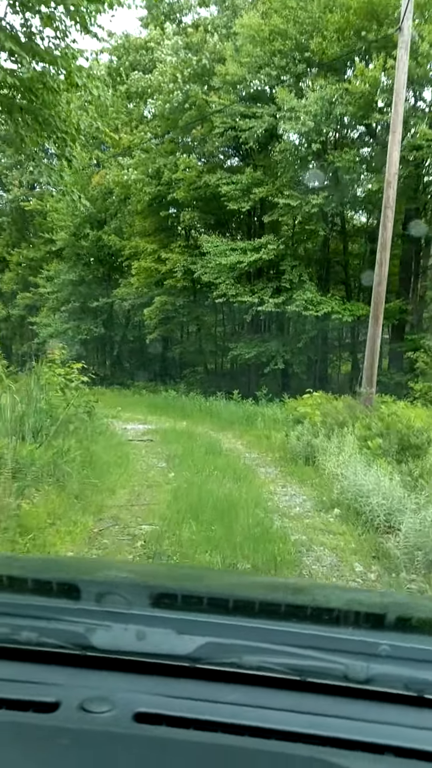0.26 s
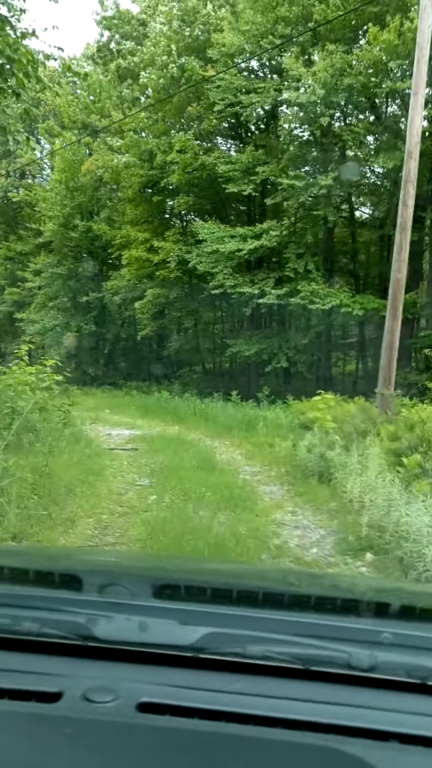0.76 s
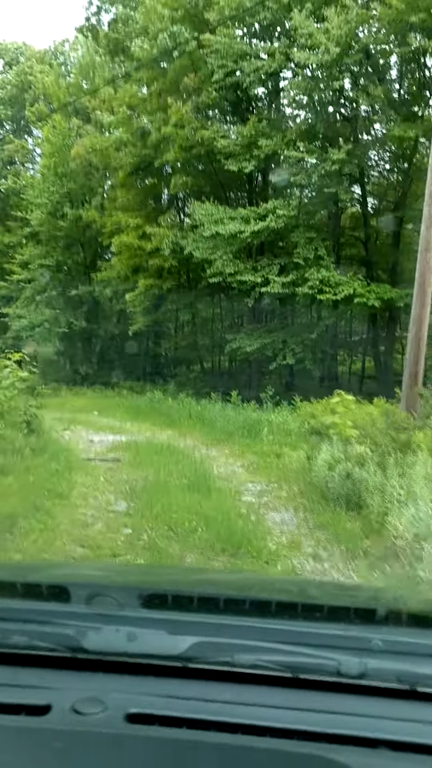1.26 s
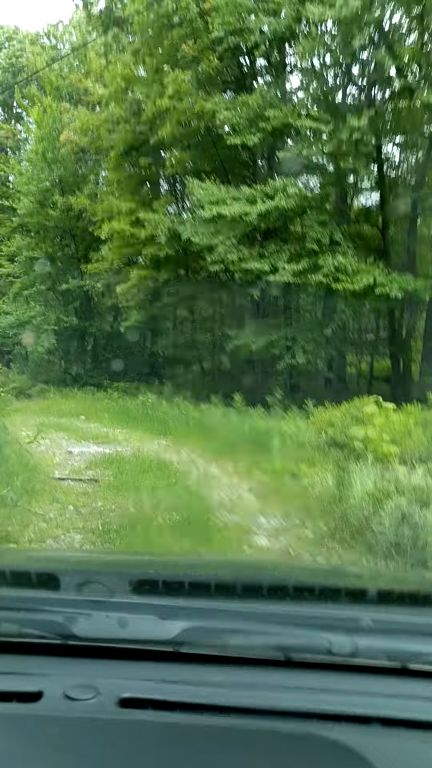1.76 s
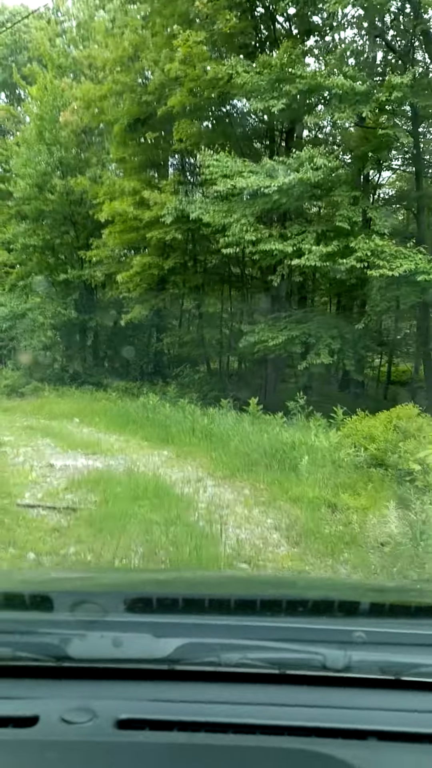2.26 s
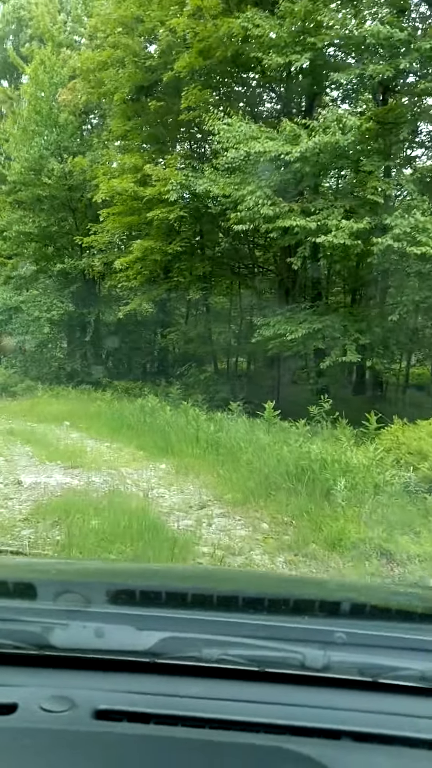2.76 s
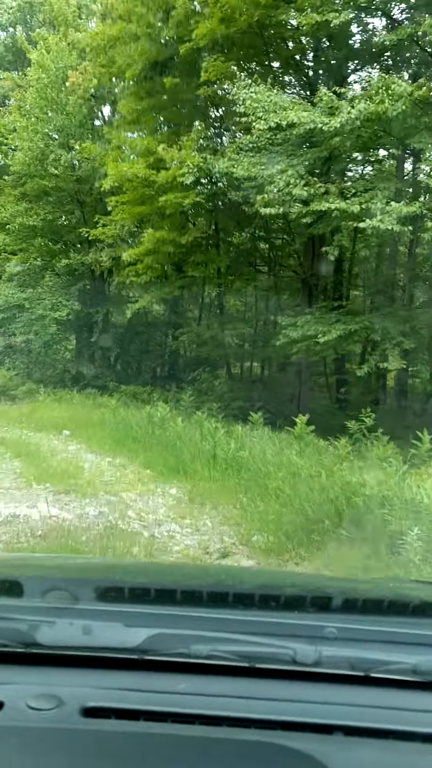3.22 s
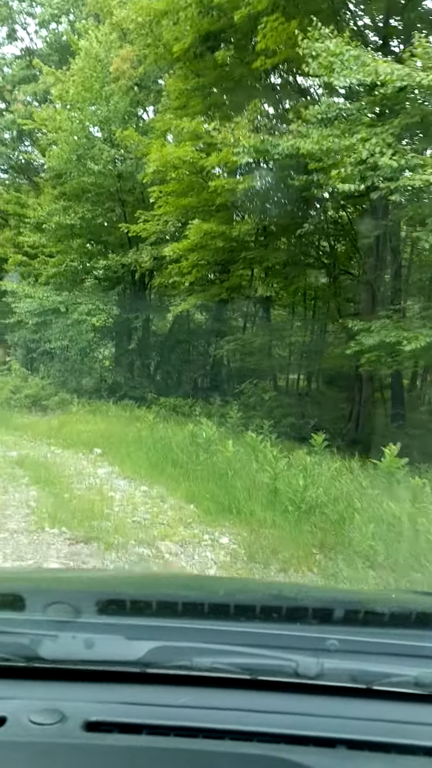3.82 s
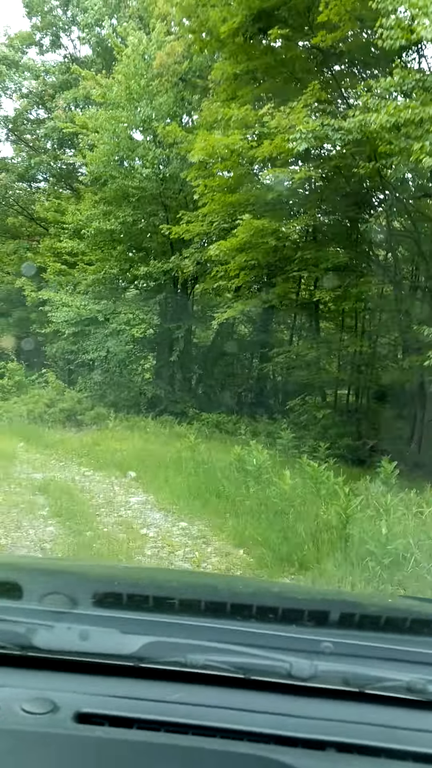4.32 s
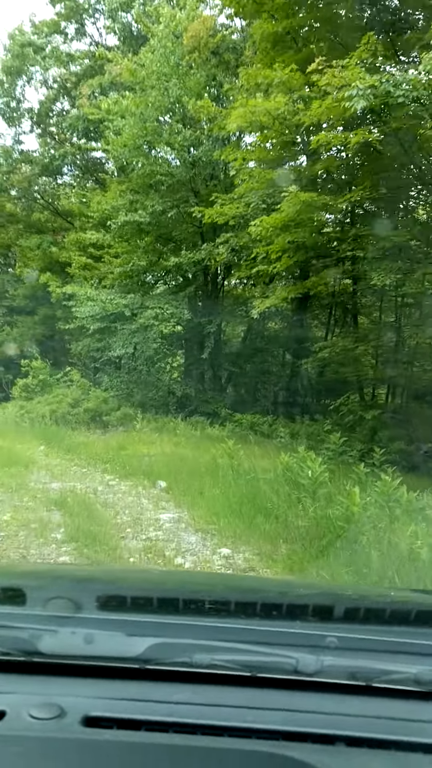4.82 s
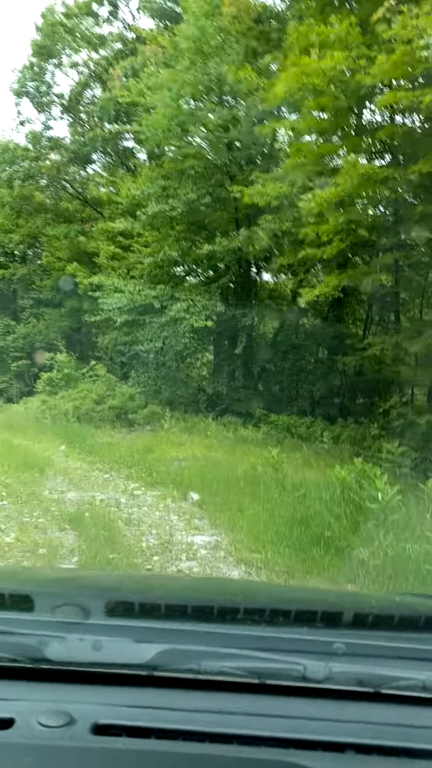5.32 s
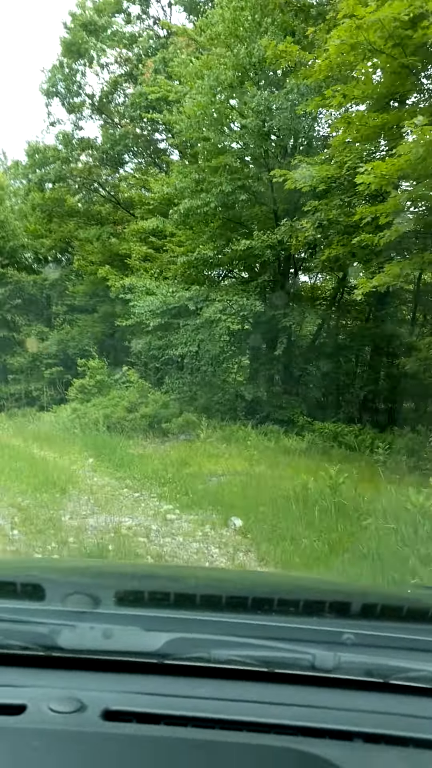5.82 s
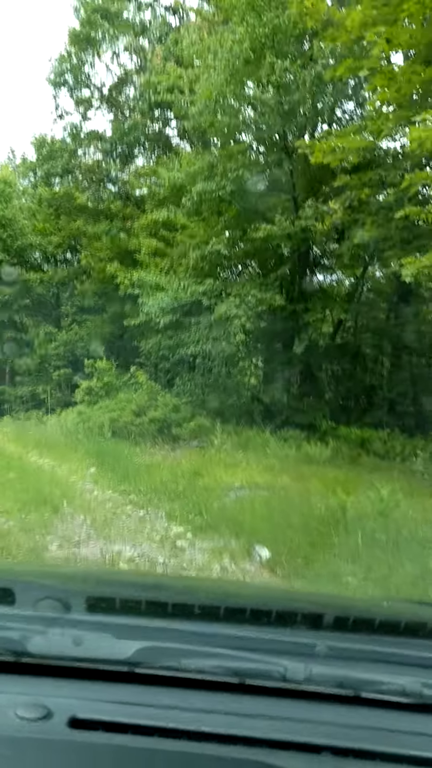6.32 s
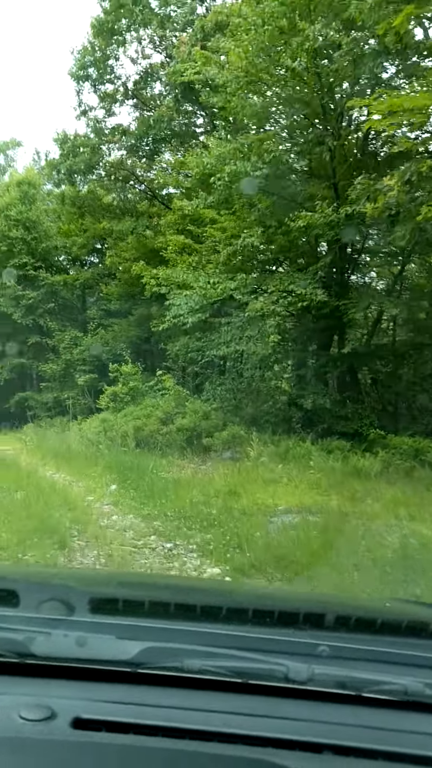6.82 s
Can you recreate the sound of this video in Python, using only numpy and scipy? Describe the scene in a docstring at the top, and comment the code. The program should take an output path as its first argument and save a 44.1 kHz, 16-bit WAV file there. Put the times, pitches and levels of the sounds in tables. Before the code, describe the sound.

Inside a car creeping over a stony grass track: deep cabin boom and tyre rumble, dull suspension thuds, hollow panel knocks and dry trim ticks.

```python
"""Inside a car creeping along a stony grass track. From the start the cabin air booms near 50 Hz (a gliding
tone and noise), road noise rumbles and stones crunch (shaped noise and short grains), over a faint high tone.
Soon wheels drop with thuds, and trim knocks and ticks (dying tones and noise bursts); from 2.3 s a small metal
part rings at times (groups of modes), and at 3.6 s and 4.9 s the floor pan hums (a dying tone). Near 5.4 s loose
metal bounces and jangles (ringing modes and a rasp); from 5.8 s trim creaks briefly (rubbed resonances)."""
import sys
import numpy as np
from scipy import signal
from scipy.fft import rfft, irfft, next_fast_len
from scipy.io import wavfile
from scipy.ndimage import uniform_filter1d, map_coordinates

SR = 44100
rng = np.random.default_rng(int(sys.argv[2]) if len(sys.argv) > 2 else 0)


def log_audio(samples):
    """Write samples as a 16-bit WAV file to the path given in sys.argv[1]."""
    # one column per channel
    frames = np.atleast_2d(samples).T
    # limit to full scale, then quantise
    limited = np.clip(frames, -1, 1)
    pcm = np.round(limited * 32767).astype(np.int16)
    wavfile.write(sys.argv[1], SR, pcm)


N = 312228  # length in samples


def amp(db):
    """Gain of a level in dB."""
    return 10 ** (np.asarray(db) / 20)


def unit(x):
    """x at rms 1."""
    return x / np.sqrt(np.mean(x ** 2) + 1e-20)


def noise(length):
    """White noise."""
    return rng.standard_normal(length)


def seconds(length):
    """Sample times of a sound lasting this many seconds."""
    return np.arange(int(SR * length)) / SR


def decay(t, t60):
    """A steady die-away that falls 60 dB in t60 seconds."""
    return amp(-60 * t / t60)


def soft_start(t, rise_s):
    """A quick but smooth rise from silence to full strength."""
    return 1 - np.exp(-t / rise_s)


def slow_start(t, rise_s):
    """A rise that begins gently, then swells to full strength."""
    return 1 - np.exp(-(t / rise_s) ** 2)


def sine(hz, t):
    """A pure tone of fixed pitch."""
    return np.sin(2 * np.pi * hz * t)


def gliding_sine(hz):
    """A pure tone whose pitch changes from sample to sample."""
    return np.sin(2 * np.pi * np.cumsum(hz) / SR)


def curves(rows):
    """One value per sample for each column after the time."""
    times, *columns = np.transpose(rows)
    return [np.interp(np.arange(N) / SR, times, column) for column in columns]


def wobble(rate):
    """A smooth random curve, rate knots a second."""
    knots = noise(int(N * rate / SR) + 4)
    return map_coordinates(knots, [np.arange(N) * rate / SR])


def coloured(x, points):
    """x through a spectrum of (frequency [Hz], gain [dB]) points on a log axis."""
    m = next_fast_len(len(x) + 8192)
    hz, db = np.transpose(points)
    bins = np.fft.rfftfreq(m, 1 / SR)
    gain = amp(np.interp(np.log(bins + 1), np.log(hz + 1), db))
    return irfft(rfft(x, m) * gain, m)[:len(x)]


def add(track, s, sound):
    """Mixes a sound in at s seconds."""
    part = track[round(s * SR):][:len(sound)]
    part += sound[:len(part)]


def ring(modes, t, scatter_db):
    """One blow on a set of modes (natural tones of an object), each at a new random strength."""
    total = np.zeros(len(t))
    for hz, db, t60 in modes:
        total += amp(db + rng.normal(0, scatter_db)) * decay(t, t60) * sine(hz, t)
    return total


LUMPS_DB = 1.8  # size of the slow random swells of boom and suspension

# Path of the cabin boom: (time [s], pitch [Hz], level [dB])
BOOM_PATH = [(0.0, 54.3, -39), (0.04, 55.6, -32.5), (0.47, 58.96, -30), (0.63, 51.9, -34.5),
             (0.71, 51.7, -40), (0.75, 55.2, -25.5), (0.87, 60.5, -36), (1.01, 60.2, -36), (1.05, 58, -65),
             (1.14, 55.35, -24.5), (1.22, 49, -32.5), (1.48, 48.3, -27.5), (1.62, 52.13, -33.5),
             (1.81, 52, -29.5), (1.93, 49.8, -34.5), (2.15, 48.1, -28), (2.27, 56.07, -35.5),
             (2.38, 48.64, -37), (2.66, 51.22, -25), (2.74, 48.4, -50), (2.8, 48.1, -25), (2.98, 53.2, -47),
             (3.06, 59.7, -39), (3.14, 63.96, -34), (3.23, 60.8, -28), (3.37, 51.22, -32.5),
             (3.69, 50.9, -32.5), (3.82, 45.5, -54), (3.86, 44.5, -37), (4.0, 49.3, -35),
             (4.26, 50.33, -34.5), (4.36, 54.4, -26.5), (4.51, 57.1, -47), (4.57, 50.7, -26),
             (4.65, 46.1, -35.5), (4.79, 41.63, -33), (5.17, 45.97, -34.5), (5.28, 54.5, -36),
             (5.4, 47.6, -34), (5.56, 48.25, -30.5), (5.64, 52.42, -33), (5.84, 56.1, -33),
             (6.13, 48.04, -32), (6.7, 50.6, -32), (6.98, 50.7, -35.5), (7.08, 56, -29)]


def boom():
    """The lowest cabin mode, dragged about by engine firing and bumps, with a rough skirt of noise."""
    hz, db = curves(BOOM_PATH)
    glide = gliding_sine(hz * (1 + 0.0838 * wobble(22)))
    skirt_shape = [(20, -25.0), (36, -3.5), (50, -7.0), (66, -2.0), (90, -12.5), (200, -85)]
    skirt = unit(coloured(noise(N), skirt_shape))
    tone = unit(amp(0.7 * wobble(24) + LUMPS_DB * wobble(9)) * glide)
    return amp(db) * (tone + 0.72 * skirt)


def jolts(rate, t60):
    """Small stones under the tyres: soft random bumps of level, about rate a second."""
    kicks = (rng.random(N) < rate / SR) * rng.exponential(size=N)
    t = seconds(1 / 8)
    return signal.fftconvolve(kicks, decay(t, t60) * soft_start(t, 0.0038))[:N]


# Road noise before it is shaken: (time [s], suspension level [dB], floor pan level [dB],
# tyre crunch level [dB], rustle level [dB])
ROAD_LEVELS = [(0.0, -33, -48, -53, -69.5), (0.43, -33.5, -45.5, -53.5, -74.5),
               (0.85, -36, -43.5, -54, -70.5), (1.14, -37, -43.5, -55, -72.5),
               (1.56, -39, -45.5, -58, -75.5), (1.73, -38, -41.5, -52, -68.5),
               (1.89, -31, -42.5, -54.5, -72), (2.62, -36.5, -42.5, -51, -69),
               (2.78, -36.5, -43, -51, -71.5), (3.1, -32, -45, -54, -70), (3.35, -36.5, -46, -56.5, -71.5),
               (3.84, -42.5, -46.5, -55, -70.5), (4.4, -33, -45.5, -55.5, -71),
               (4.79, -40.5, -44, -55.5, -70), (5.15, -35, -53.5, -56, -72),
               (5.32, -35.5, -41.5, -56.5, -69), (5.52, -34.5, -42, -54, -65.5),
               (5.72, -35.5, -49.5, -52, -66.5), (5.96, -52, -47.5, -61, -70.5),
               (6.17, -33.5, -43, -56, -73.5), (6.56, -38, -47, -60, -74.5), (7.08, -36.5, -45, -56.5, -72)]
# Tone colour of each path of road noise: (frequency [Hz], relative level [dB])
SUSPENSION_SHAPE = [(13, -27), (22, -12), (38, -12), (59, 2.5), (108, -4), (134, -7), (172, -25),
                    (216, -18), (260, -32.5), (340, -64), (570, -120)]
PAN_SHAPE = [(76, -53), (130, -1.5), (219, -8), (274, -11.5), (700, -31.5), (910, -47), (1540, -120)]
CRUNCH_SHAPE = [(240, -2.5), (400, 0.5), (650, -9), (890, -9), (1110, -9.5), (2660, -27), (3460, -38.5),
                (4500, -44), (5850, -57), (9900, -120)]
RUSTLE_SHAPE = [(1470, -10), (2500, -3.5), (3480, -1), (5640, -9.5), (8170, -9.5), (9570, -13.5),
                (15100, -16), (16100, -30), (16500, -56)]


def road():
    """Four paths of road noise; stones shake them partly together, partly each alone."""
    suspension_db, pan_db, crunch_db, rustle_db = curves(ROAD_LEVELS)
    shared, drops = jolts(70, 0.065), shake()

    def shaken(shape, depth, lumpy_db, drop_share):
        """Noise made uneven by stones, coloured by its path, then shaken by the wheel drops."""
        hiss = noise(N)
        stony = 1 + depth * (shared + jolts(60, 0.052))
        rough = hiss * stony * amp(lumpy_db * wobble(30))
        return (1 + drop_share * drops) * unit(coloured(rough, shape))

    lumps = amp(suspension_db + LUMPS_DB * wobble(9))
    suspension = lumps * shaken(SUSPENSION_SHAPE, depth=0.045, lumpy_db=0.52, drop_share=0.92)
    pan = amp(pan_db) * shaken(PAN_SHAPE, depth=0.36, lumpy_db=2.97, drop_share=0.75)
    crunch = amp(crunch_db) * shaken(CRUNCH_SHAPE, depth=0.48, lumpy_db=2.46, drop_share=0.2)
    rustle = amp(rustle_db) * shaken(RUSTLE_SHAPE, depth=0.32, lumpy_db=3.0, drop_share=0.12)
    return suspension + pan + crunch + rustle


# Stone grains, one row for large and one for small stones: (grains per second [1/s], smallest level [dB]
# before crunch and pitch shift it, level range [dB], centre pitch [Hz], pitch spread [octaves],
# cycles to fall 20 dB [cycles])
COARSE_STONES = (260, -62, 13, 900, .6, 4)
FINE_STONES = (340, -76, 13, 2500, .45, 3)


def grit(rate, least_db, range_db, centre_hz, octaves, life):
    """Single stones crunch under the tyres: short damped grains, following the tyre crunch."""
    crunch_db = curves(ROAD_LEVELS)[2]
    chance = rng.random((round(rate * N / SR), 2))
    start = (chance[:, :1] * N).astype(int)
    size = chance[:, 1:] ** 3  # mostly small, now and then large
    hz = centre_hz * 2 ** (octaves * noise((len(chance), 1)))
    k = np.arange(SR // 40)
    cycles = hz * k / SR
    follow_db = crunch_db[start] - crunch_db.mean()
    db = least_db + range_db * size + follow_db - 6 * np.log2(hz / centre_hz)
    grains = amp(db - 20 * cycles / life) * np.sin(2 * np.pi * cycles)
    return np.bincount((start + k).ravel(), grains.ravel())[:N]


# Wheel drops: (time [s], level [dB], pitch [Hz])
WHEEL_DROPS = [(0.191, -27, 103.5), (0.383, -22, 242), (0.465, -26, 101), (0.734, -25.5, 219),
               (0.89, -22, 126), (1.024, -11, 107), (1.134, -18, 103.7), (1.255, -24, 194),
               (1.319, -16.5, 127), (1.756, -14, 121), (1.837, -25, 118), (2.122, -28, 122.5),
               (2.154, -28, 96.7), (2.337, -19, 176), (2.388, -33, 146), (2.45, -20, 147),
               (2.51, -17.5, 104.1), (2.556, -20.5, 126), (2.87, -30.5, 257), (3.152, -23, 139.4),
               (3.527, -22, 116), (3.575, -30, 144), (3.588, -24.5, 302), (3.616, -17, 121),
               (3.968, -24, 154.7), (4.146, -34, 102.4), (4.285, -43, 101.9), (4.516, -29, 290),
               (4.526, -16.5, 130), (4.708, -24, 198.9), (5.408, -23, 128), (5.601, -26.5, 100.3),
               (5.931, -13, 122), (6.043, -26, 102.8), (6.216, -54, 117), (6.71, -22.5, 105.7),
               (6.845, -19.5, 100.3)]
# The floor pan hums by itself: (time [s], level [dB])
PAN_HUMS = [(3.59, -32.5), (4.86, -43.5)]
PAN_HUM_HZ, PAN_HUM_T60_S = 215.3, 0.7
THUMP_DB, THUMP_T60_S = -22, 0.083  # rough thump under the pitched thud


def thuds():
    """A wheel drops: soft cycles of the floor pan over a rough thump; at two moments the pan hums by itself."""
    out, t = np.zeros(N), seconds(1 / 2)
    thump_shape = [(60, -21), (180, -8.5), (350, 6.0), (600, -27.5), (1200, -21.5), (20000, -88)]
    for s, db, hz in WHEEL_DROPS:
        thump = amp(THUMP_DB) * decay(t, THUMP_T60_S) * unit(coloured(noise(len(t)), thump_shape))
        thud = decay(t, 0.063) * sine(hz, t)
        add(out, s, amp(db) * soft_start(t, 0.0057) * (thud + thump))
    hum = decay(t, PAN_HUM_T60_S) * soft_start(t, 0.006) * sine(PAN_HUM_HZ, t)
    for s, db in PAN_HUMS:
        add(out, s, amp(db) * hum)
    return out


SHAKE_LEAD_S = 0.03  # the shaking starts before the wheel lands
SHAKE_RISE_S, SHAKE_T60_S = 0.045, 0.21
SHAKE_REFERENCE_DB = -32  # a wheel drop at this level shakes with strength 1, before rise and decay


def shake():
    """How hard the body shakes around the wheel drops."""
    strength, t = np.zeros(N), seconds(1 / 3)
    swell = decay(t, SHAKE_T60_S) * slow_start(t, SHAKE_RISE_S)
    for s, db, _ in WHEEL_DROPS:
        add(strength, s - SHAKE_LEAD_S, amp(db - SHAKE_REFERENCE_DB) * swell)
    return strength


# Resonances of the dashboard panels: (frequency [Hz], width [Hz], level [dB])
PANEL_MODES = [(383, 40, 6), (540, 50, 8), (617, 50, 10), (782, 40, 7), (892, 35, 6), (1150, 200, -12),
               (1411, 60, 3), (1668, 80, 5), (1772, 50, 4), (2181, 80, 2), (2588, 60, 2), (2806, 60, 6)]


def panelled(x):
    """x with the resonances of the dashboard panels laid over it."""
    m = next_fast_len(len(x) + 8192)
    f = np.fft.rfftfreq(m, 1 / SR)
    response = 0.5  # the part that passes unchanged in tone
    for hz, width, db in PANEL_MODES:
        response = response + amp(db) * 1j * f * width / (hz * hz - f * f + 1j * f * width)
    return irfft(rfft(x, m) * response, m)[:len(x)]


# Hollow knocks of panels: (time [s], level [dB], pitch [Hz], relative level of the upper lobe [dB],
# length of the contact [s])
PANEL_KNOCKS = [(0.175, -39.5, 910, -15, 0.006), (0.903, -32.5, 870, -19.5, 0.0037),
                (.992, -45, 1270, -13, 0.01), (1.004, -33, 580, -32, 0.0099),
                (1.029, -37.5, 630, -21, 0.0097), (1.385, -43, 666, -17, .004),
                (1.489, -45, 1110, -21, .004), (1.814, -38, 603, -29, 0.0035),
                (2.037, -36, 640, -16, 0.0025), (2.126, -35.5, 493.5, -18, 0.014),
                (2.331, -28.5, 579, -6, 0.0087), (2.552, -37, 804, -15, 0.005),
                (2.6, -42.5, 851.6, -15, .006), (2.745, -47, 1133, -30, 0.0028),
                (2.772, -28, 500, -34, 0.0075), (2.96, -36.5, 497, -17, 0.0026),
                (3.209, -37.5, 731, -12, 0.0064), (3.285, -46, 794.6, -18, 0.03),
                (3.345, -39, 915, -26, 0.019), (3.38, -51, 914.5, -10, 0.0085),
                (3.515, -36.5, 1008, -18, 0.017), (3.585, -41, 665, -22, 0.0051),
                (3.84, -40, 539, -7.5, 0.0052), (4.151, -39, 658, -9, 0.0027),
                (4.385, -38, 950, -22, 0.0018), (4.4, -52, 900, -10, 0.0076),
                (4.457, -47, 1035, -27, 0.0076), (4.513, -36, 750, -27, 0.0096),
                (5.052, -26, 538, -17.5, 0.0013), (5.371, -27.5, 572, 7, 0.0033),
                (5.42, -45, 1000, -20, 0.024), (5.444, -30.5, 492, -47, 0.0044),
                (5.659, -26.5, 459.7, -13, 0.0049), (5.894, -22, 633, -6, 0.0013),
                (5.8955, -18.5, 615, -5.5, 0.011), (6.134, -42, 592, -15, 0.0084),
                (6.175, -47, 697, -9, .015), (6.428, -45.5, 653, -7, 0.0071),
                (6.569, -44, 612, -15.5, 0.017), (6.934, -40.5, 569.5, -33, 0.0075)]
KNOCK_T60_S = 0.052  # counted from the end of the contact


def knocks():
    """A soft blow: noise around a pitch through the panel modes, swelling and holding during the contact."""
    out, t = np.zeros(N), seconds(1 / 8)
    for s, db, hz, upper_db, contact_s in PANEL_KNOCKS:
        after = np.maximum(t - contact_s, 0)
        envelope = amp(-60 * (after / KNOCK_T60_S) ** 1.08) * soft_start(t, 0.00014 + 0.13 * contact_s)
        shape = [(hz / 2.9, -22), (hz / 1.42, -5), (hz, 0), (hz * 1.17, -4),
                 (hz * 1.17 + 250, min(-6, upper_db + 17.0)), (1900, upper_db - 0.5),
                 (2400, upper_db - 5.5), (4000, upper_db - 13.0), (20000, -90)]
        blow = envelope * panelled(coloured(noise(len(t)), shape))
        even = np.linalg.norm(envelope) / np.linalg.norm(blow)  # evens out the luck of the noise
        add(out, s, amp(db) * 0.34 * even * blow)
    return out


# Dry ticks of trim: (time [s], level [dB], relative level of the hollow body [dB],
# relative level of the treble [dB], snap centre [Hz], nominal decay [s], scaled and limited in ticks())
TRIM_TICKS = [(.2633, -42.5, -4.5, -19, 3240, 0.05), (.396, -49, -7, -36, 4030, .036),
              (.4753, -47.5, -16, -34, 2980, 0.048), (.5665, -44, -8.5, -11.5, 3340, 0.066),
              (.7234, -30, -19, -25, 4600, 0.024), (.7262, -24, -14, -17, 3760, 0.049),
              (.7805, -48, -25, -23, 5270, .025), (.7872, -30, -20, -18, 4386, 0.047),
              (.7935, -36, -17, -12, 4560, 0.025), (.993, -58, 1, -30, 3085, 0.055),
              (1.0762, -41, -22, -42, 4060, 0.022), (1.3244, -43, -6.5, -13.5, 3680, 0.047),
              (1.4596, -44, -16, -34, 3926, 0.028), (1.49, -73, 4, -21, 3146, 0.038),
              (1.705, -54, -25, -35, 3900, .025), (1.731, -45.5, -21, -9.5, 3300, 0.14),
              (1.7624, -43, -11, -28, 3860, 0.051), (1.7753, -40.5, -10, -10, 3950, 0.03),
              (1.8165, -40.5, -2, -40, 2500, 0.024), (1.8961, -43.5, -17, -24, 3400, 0.062),
              (1.9375, -44.5, -13, -31, 4050, 0.047), (1.9803, -47, -20, -14, 3962, 0.037),
              (2.0776, -47.5, -16, -6.5, 4820, 0.14), (2.2345, -34, -13, -14, 4840, 0.03),
              (2.2418, -38, -23, -18, 4345, 0.024), (2.3322, -34, -12.5, -21, 3437, 0.074),
              (2.387, -37, -23, -26, 3750, 0.035), (2.452, -48, -25, -15, 3770, 0.047),
              (2.5563, -39, -18, -18.5, 3240, 0.13), (2.6115, -43, -11, -14, 3320, 0.05),
              (2.7422, -47.5, -11, -15, 3713, 0.22), (3.1194, -47, -16, -10, 3460, 0.14),
              (3.209, -56.5, 1, -16, 3333, 0.074), (3.5253, -46, -10.5, -17.5, 3307, 0.14),
              (3.6088, -32.5, -10.5, -7, 3534, 0.047), (3.6576, -44, -19, -17.5, 3090, 0.066),
              (3.7172, -45, -8, -8, 4113, 0.029), (4.1555, -38, -13, -12, 4180, 0.049),
              (4.261, -48.5, -12, -17, 3500, 0.19), (4.391, -52, -8, -25, 3600, 0.032),
              (4.4214, -38.5, -12, -13.5, 4026, 0.046), (4.5104, -50, -11, -18, 3000, 0.086),
              (4.482, -58, -20, -7, 4000, .04), (4.661, -54, -25, -30, 3700, .03),
              (4.7227, -40, -2.5, -11, 3920, 0.023), (4.8186, -51.5, 4, -23, 3470, 0.044),
              (5.0504, -39.5, -27, -16.5, 3155, 0.17), (5.147, -59, -25, -30, 4676, 0.036),
              (5.293, -65, -20, 3, 3940, 0.023), (5.3196, -35.5, -8, -11.5, 4140, 0.033),
              (5.3368, -34, -19, -18, 3700, 0.035), (5.3498, -28.5, -14, -18.5, 4900, 0.045),
              (5.372, -26, -10, -16.5, 3930, 0.04), (5.3857, -25.5, -3, -16, 5250, 0.023),
              (5.3979, -29.5, -5, -18, 4630, 0.046), (5.656, -37.5, -2.5, -21, 4536, 0.035),
              (5.7096, -47, -16, -16, 3370, 0.059), (5.894, -27, -12, -11, 3452, 0.11),
              (5.9, -20, -30, -17.5, 4530, 0.066), (5.9497, -45, -19, -10.5, 4170, 0.042),
              (6.333, -46.5, -29, -7, 3130, 0.1), (6.354, -43, -15, -28, 3427, 0.079),
              (6.3754, -47, -9, -19, 3142, 0.04), (6.4692, -42, -26, -16.5, 4590, 0.05),
              (6.7126, -43.5, -17, -18, 3116, 0.052), (6.773, -45, -3, -17, 3634, 0.019),
              (6.8638, -45.5, -18, -37, 3397, 0.036)]
# Modes of the trim: (frequency [Hz], decay by 60 dB [s])
TRIM_MODES = [(2600, .05), (3240, .022), (3500, .04), (3820, .025), (4010, .022), (4350, .022),
              (4720, .022), (4980, .02), (5600, .02)]
FAINT_TICKS = 36  # how many faint ones fall at random
TICK_RISE_S, CRACK_T60_S = 0.00064, 0.0057
TICK_CLOSES = 1.4  # above 1 the decay steepens as it goes
BODY_RISE_S = 0.0032  # the hollow behind the trim answers a tick late
TREBLE_T60_SHARE = 0.73  # the treble dies sooner
SNAP_RING, SNAP_FALL_DB = 0.085, 20  # share of the trim's ring; its loss per octave from the snap centre


def ticks():
    """A sharp crack, a short ring of the trim and a burst that dies in the cabin's padding."""
    out, t = np.zeros(N), seconds(1 / 8)
    # random rows between these limits, columns as in TRIM_TICKS
    faint = rng.uniform([0, -76, -20, -30, 3000, .03], [N / SR - .1, -68, -8, -10, 4500, .05],
                        size=(FAINT_TICKS, 6))

    def closing(life):
        """A decay that steepens as it goes."""
        return amp(-60 * (t / life) ** TICK_CLOSES)

    def fall(t60):
        """A quick crack, then a longer tail."""
        return 0.5 * closing(np.clip(t60, .01, .13) / 1.41) + 2.0 * decay(t, CRACK_T60_S)

    for s, db, body_db, top_db, snap_hz, t60 in [*TRIM_TICKS, *faint]:
        hollow = [(300, body_db - 33), (800, body_db + 5.5), (1300, body_db + 4.5), (1900, body_db + 14.5),
                  (2500, body_db + 5.5), (3300, body_db - 3), (16000, body_db - 54.5)]
        plastic = [(600, -50), (snap_hz * .5, -13), (snap_hz * 0.76, -5), (snap_hz, -1.5),
                   (snap_hz * 1.15, -4), (7500, -18), (16000, -60)]
        treble = [(3000, top_db - 36.0), (6000, top_db + 0.5), (7400, top_db + 5.5),
                  (11000, top_db + 3.5), (15600, top_db - 1), (16400, top_db - 7)]
        body = coloured(noise(len(t)), hollow) * closing(np.clip(0.67 * t60, .01, .1))
        body *= slow_start(t, BODY_RISE_S)
        burst = coloured(noise(len(t)), plastic) * fall(t60)
        burst += coloured(noise(len(t)), treble) * fall(TREBLE_T60_SHARE * t60)
        modes = [(hz, -SNAP_FALL_DB * abs(np.log2(hz / snap_hz)), life) for hz, life in TRIM_MODES]
        snap = SNAP_RING * ring(modes, t, scatter_db=8.0)
        add(out, s, amp(db) * (body + burst + snap) * soft_start(t, TICK_RISE_S))
    return out


# Loose metal slides: (time [s], level [dB], slide length [s], decay by 60 dB of the contacts at its end [s])
SLIDES = [(5.384, -54, 0.0023, 0.025), (5.389, -59, 0.0016, 0.033), (5.417, -45, 0.021, .06),
          (5.478, -57, 0.01196, 0.056)]
# Modes of the loose bunch: (frequency [Hz], relative level [dB], decay by 60 dB [s])
BUNCH_MODES = [(834, 3, .2), (1020, 2, .16), (1230, -7, .12), (1640, -11, .12), (2240, -10, .2),
               (2430, 1, .08), (2800, -10, .24), (3180, -13, .08), (3610, -6, .1), (3870, -1, .1),
               (3994, -4, .13), (4180, -6, .1), (4400, -4, .11), (4590, -11, .12), (5000, 0, .1),
               (5320, -9, .11), (6160, -20, .08), (6578, -16, .1), (6760, -13, 0.11), (7100, -12, 0.089),
               (7165, -10, .1), (7440, -9, .1), (7612, -10, .1), (7919, -15, 0.092), (8242, -19, .08),
               (8800, -17, .08), (9399, -13, .09), (9641, -16, .09), (9991, -15, .11)]
BUNCH_SCATTER_DB = 2.5
BUNCH_ROUGH = 0.55  # share of rattle in each mode's ring


def jangle():
    """The loose bunch lands and slides: a spray of tiny contacts keeps ringing its many modes over a rasp."""
    out, t = np.zeros(N), seconds(1 / 3)
    rasp_shape = [(500, -28), (1000, -2), (3000, -25), (4000, -3), (4700, -8), (6000, -12),
                  (7300, -17.0), (9500, -10), (11000, -9), (16000, -14.5)]
    for s, db, length, t60 in SLIDES:
        spray = noise(len(t)) * rng.exponential(size=len(t))
        chatter = spray * decay(np.maximum(t - length, 0), t60)
        chatter = chatter / np.linalg.norm(chatter)
        rung = np.zeros(len(t))
        for mode in BUNCH_MODES:
            blow = ring([mode], t, BUNCH_SCATTER_DB)
            blow *= 1 + BUNCH_ROUGH * unit(uniform_filter1d(noise(len(t)), size=150))
            # the contacts spread the ringing in time; the mode keeps its strength
            rung += unit(signal.fftconvolve(chatter, blow)[:len(t)]) * blow.std()
        add(out, s, amp(db) * (rung + 35 * coloured(chatter, rasp_shape)))
    return out


# Rings of the metal part: (time [s], level [dB], relative level of its lowest mode [dB],
# of its middle modes [dB], of its top mode [dB])
METAL_RINGS = [(2.331, -38.5, -34, -9, -25), (4.513, -45, -29, -17, -21), (5.0552, -46, -30, -28, -10),
               (5.6567, -58, -25, -3, -11), (5.8978, -39, -20, 2, -9), (5.9143, -40, -16, -1, -7),
               (5.929, -50, -5, -20, -20), (6.0184, -53, -25, -13, -12)]
# Modes of the metal part: (frequency [Hz], relative level [dB], decay by 60 dB [s]);
# rows: two main modes, the lowest, two middle ones, the top one
METAL_MODES = [(11110, 0, .06), (11176, -12, .06), (5852, -10, .16), (7325, 1, .055), (9700, -6, .07),
               (13088, -8, .13)]
PING_SCATTER_DB = 2.5
PING_ROUGH = 0.25  # share of rattle in the ring


def pings():
    """A small metal part is shaken for a few ms, so its ring swells before it dies."""
    out, t = np.zeros(N), seconds(1 / 5)
    groups = [METAL_MODES[:2], METAL_MODES[2:3], METAL_MODES[3:5], METAL_MODES[5:]]
    for s, db, low_db, middle_db, top_db in METAL_RINGS:
        sound = np.zeros(len(t))
        for group_db, modes in zip([0, low_db, middle_db, top_db], groups):
            sound += amp(group_db) * ring(modes, t, PING_SCATTER_DB)
        rattle = 1 + PING_ROUGH * unit(uniform_filter1d(noise(len(t)), size=60))
        add(out, s, amp(db) * slow_start(t, 0.0065) * rattle * sound)
    return out


# Short creaks of trim: (time [s], peak level [dB], length of the rub [s])
TRIM_CREAKS = [(5.791, -41.5, 0.015), (5.853, -55, 0.011), (6.604, -50, 0.021)]
# Resonances that creak: (frequency [Hz], width [Hz], relative level [dB])
CREAK_RESONANCES = [(1552, 62, 7), (1821, 66, 6)]


def creaks():
    """Trim rubs for a moment and sounds two narrow resonances."""
    out, t = np.zeros(N), seconds(1 / 10)
    ringing = np.zeros(len(t))
    for hz, width, db in CREAK_RESONANCES:
        ringing += amp(db) * np.exp(-np.pi * width * t) * sine(hz, t)
    for s, db, length in TRIM_CREAKS:
        rub = signal.fftconvolve(noise(len(t)) * (t < length), ringing)[:len(t)]
        add(out, s, amp(db) * rub / np.abs(rub).max())
    return out


WHINE_HZ, WHINE_DB = 11330, -93  # centre pitch and level


def whine():
    """A thin, unsteady high tone: its pitch and level drift a little at random."""
    return amp(WHINE_DB + 1.5 * wobble(6.6)) * gliding_sine(WHINE_HZ + 35 * wobble(25))


def scene():
    """Everything in the cabin, mixed to one channel."""
    rolling = boom() + road() + (grit(*COARSE_STONES) + grit(*FINE_STONES))
    blows = thuds() + knocks() + ticks()
    return (rolling + blows + creaks() + pings() + jangle() + whine())[None]


TOP_HZ = 16500


def record(dry):
    """Keeps nothing above the band limit: frequencies from TOP_HZ up are cut away."""
    m = next_fast_len(N + 8192)
    kept = np.fft.rfftfreq(m, 1 / SR) < TOP_HZ
    return irfft(rfft(dry, m) * kept, m)[:, :N]


dry = scene()
out = record(dry)
log_audio(out)
```